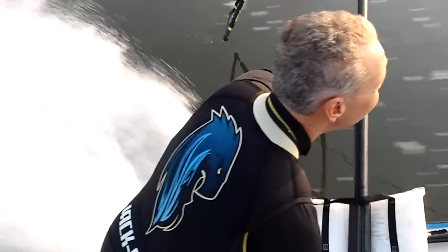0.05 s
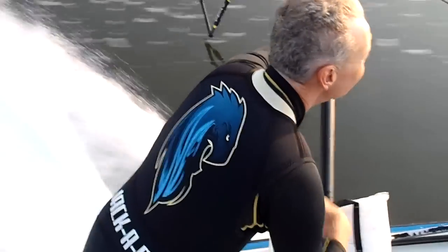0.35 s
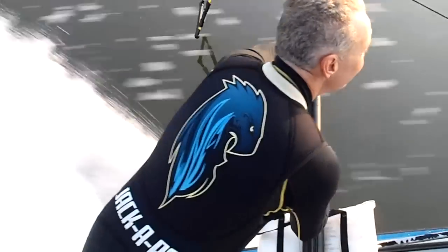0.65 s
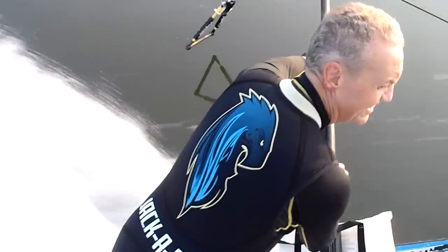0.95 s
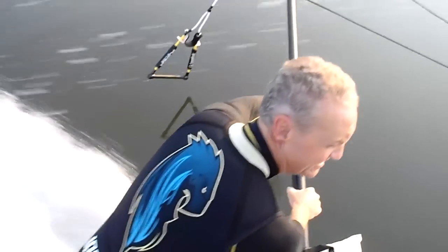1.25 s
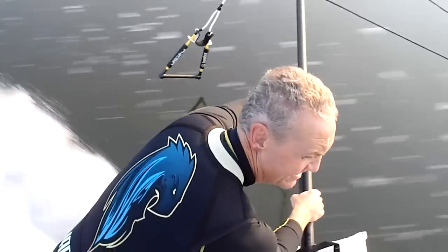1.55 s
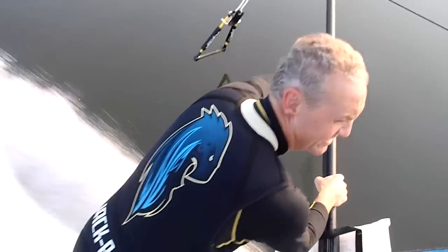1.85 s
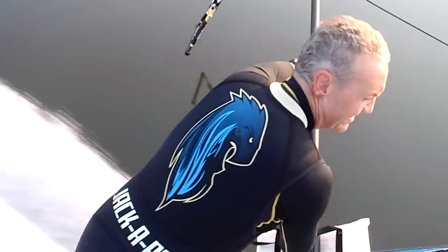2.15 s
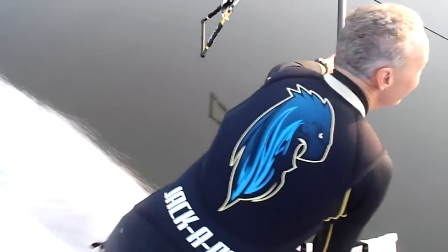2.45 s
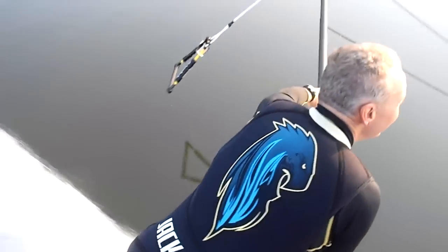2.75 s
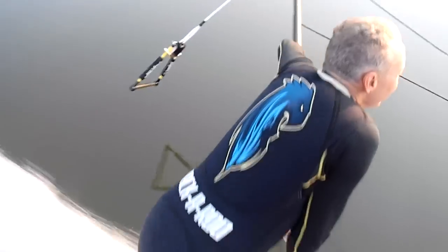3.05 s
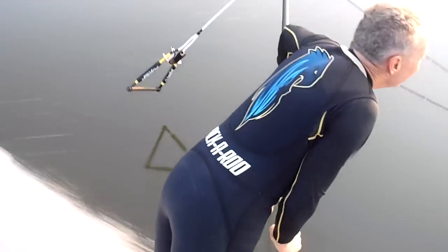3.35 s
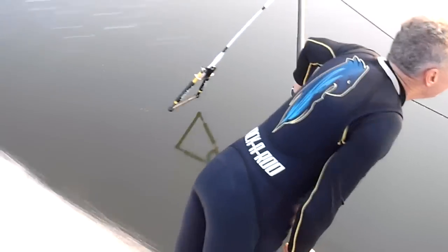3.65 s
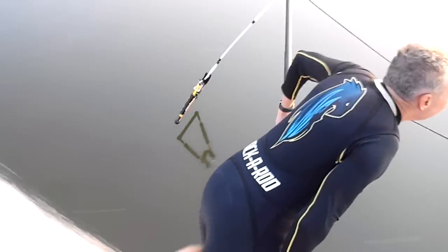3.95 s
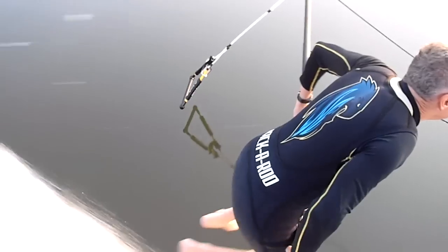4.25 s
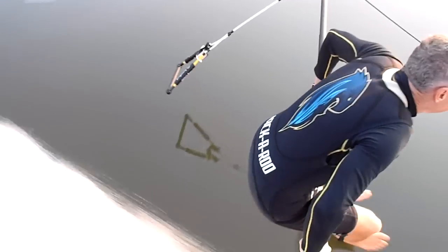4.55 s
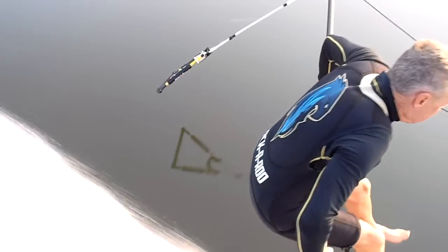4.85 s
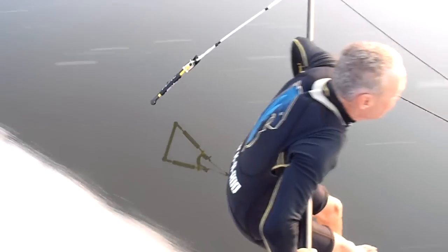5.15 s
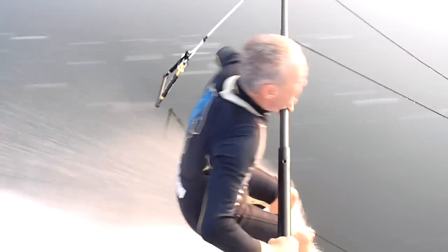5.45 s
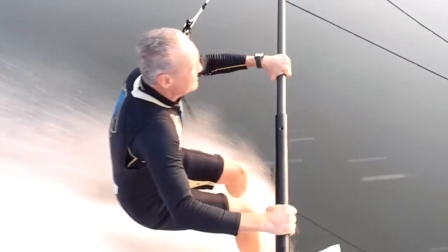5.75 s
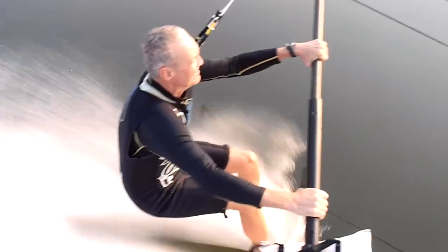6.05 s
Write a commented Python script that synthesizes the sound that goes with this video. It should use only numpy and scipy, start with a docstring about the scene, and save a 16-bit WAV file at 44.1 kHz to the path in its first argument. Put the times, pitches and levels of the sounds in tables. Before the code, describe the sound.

Wind buffets the microphone on a speeding ski boat, with a roaring wake and hissing spray over a droning engine.

```python
"""Wind and wake roar aboard a ski boat, over the drone of a V8 gaining speed.
Turbulent air and water make broadband noise; periodic firings make the engine's tones.
Spray hisses beside the hull, and a barefoot skier on the boom sets his feet into the water.
Gusts buffet a small, dull microphone, whose diaphragm gives more one way than the other."""
import sys
import numpy as np
from scipy import signal
from scipy.fft import rfft, irfft, next_fast_len
from scipy.io import wavfile
from scipy.ndimage import uniform_filter1d, map_coordinates

SR = 44100
rng = np.random.default_rng(int(sys.argv[2]) if len(sys.argv) > 2 else 0)


def int16_out(signal):
    """Quantize to a 16-bit WAV file."""
    q = np.round(np.clip(np.atleast_2d(signal).T, -1, 1) * 32767)
    wavfile.write(sys.argv[1], SR, q.astype(np.int16))


N = 273861

# brief gusts: centre_s, length_s, rise_db
GUSTS = [(.05, 0.052, 4), (.1, 0.022, 2.5), (.135, .03, 0.5), (.344, .02, 6), (.785, 0.05, 2.5),
         (1.11, 0.043, 3), (1.42, 0.18, 0), (1.716, 0.012, 10.5), (2.02, 0.046, 3), (2.275, 0.041, 5),
         (2.462, 0.032, 4), (2.665, 0.035, 4.5), (2.725, 0.022, 3.5), (2.925, 0.035, 3), (3.08, .04, 3.5),
         (3.157, 0.031, 4.5), (3.468, 0.019, 2), (3.742, 0.023, 7.5), (3.905, 0.026, 3.5), (4.36, 0.025, 3),
         (4.645, 0.047, 5.5), (4.73, 0.037, 3.5), (4.867, 0.031, 3.5), (5.011, 0.027, 4),
         (5.248, 0.043, 2.5), (5.353, 0.019, 3), (5.452, 0.037, 5), (5.715, 0.059, 1.5), (5.906, 0.027, 1)]
# brief lulls in the roar of wind and water: centre_s, length_s, dip_db
LULLS = [(.97, .05, 3), (1.49, .02, 0), (1.578, 0.044, 3.5), (1.687, 0.021, 5), (1.795, 0.021, 1),
         (2.49, 0.025, 2), (2.596, 0.026, 0), (2.836, 0.012, 1), (2.968, 0.019, 5), (3.037, .022, 3),
         (3.121, 0.019, 5.5), (3.352, 0.02, 5), (3.432, 0.02, 6.5), (3.586, 0.021, 5), (3.654, 0.042, 3),
         (3.844, .022, 3), (4.024, 0.042, 4), (4.408, .028, 4), (4.513, 0.015, 4.5), (4.597, 0.02, 5),
         (4.79, 0.027, 1.5), (5.19, 0.017, 4), (5.388, 0.023, 9.5), (5.628, 0.026, 4.5)]


def wind(eddies, buffet_db, roar_db, flutter_db):
    """Turbulent pressure fluctuations make a gusty roar and a low buffeting at the microphone port."""
    # strength of the wind over the boat and of the rumble at the port: time_s, level_db
    wind_levels = [(0, -23), (.1, -28), (.22, -26.5), (.5, -26), (.8, -23), (.98, -28), (1.2, -24),
                   (1.45, -21.5), (1.9, -26), (2.5, -25.5), (2.7, -25), (3.2, -24), (4.3, -24), (4.8, -24),
                   (5.3, -22.5), (5.6, -24), (5.78, -24), (5.98, -21.5), (6.12, -30), (6.21, -23)]
    rumble_levels = [(0, -28.5), (.18, -35.5), (.36, -33.5), (.55, -38), (.85, -40), (1.02, -47.5),
                     (1.4, -48.5), (1.9, -49), (2.6, -44.5), (3.4, -46.5), (3.8, -46.5), (4.3, -50),
                     (5.5, -45), (6.21, -58.5)]
    # eddies that swell the rumble: centre_s, length_s, rise_db
    buffets = [(.275, 0.036, 7.5), (.665, .05, -0.5), (2.65, 0.04, 2), (3.7, 0.12, 3), (4.63, 0.08, 7.5)]
    # spectra of rumble and roar: frequency_hz, density_db
    rumble_spectrum = [(12, -0.5), (25, 4.5), (40, -1), (56, 3.5), (80, 1.5), (110, 4), (200, -19.5),
                       (500, -44.5)]
    roar_spectrum = [(40, -37.5), (90, -13), (125, -6.5), (160, -1.7), (210, 1), (280, 0), (360, -3),
                     (500, -7), (750, -16.5), (1400, -33), (4000, -44)]
    rumble_db = buffet_db + curves(rumble_levels)[0] + swells(buffets)
    rumble = amp(rumble_db) * rush(rumble_spectrum, patchy_db=1.0)
    roar = steadied(rush(roar_spectrum, patchy_db=1.0), span_s=0.05)
    gusting_db = curves(wind_levels)[0] + swells(GUSTS) - swells(LULLS)
    return rumble + amp(gusting_db + roar_db + flutter_db * eddies) * roar


def thumps(gain_db, throb_hz, half_width_s):
    """Transient oscillation: a hard eddy rocks the air in the port for a cycle or two."""
    # hard gusts on the microphone: centre_s, level_db
    hard_gusts = [(0.046, -16), (0.063, -9.5), (0.105, -9.5), (0.135, -11), (0.261, -21)]
    out = np.zeros(N)
    for centre_s, db in hard_gusts:
        t = np.arange(N) / SR - centre_s
        out -= amp(db + gain_db) * np.sin(2 * np.pi * throb_hz * t) * np.exp(-(t / half_width_s) ** 2)
    return out


def water(eddies, wake_gain_db, spray_gain_db, flutter_db, burst_db, gust_share, lull_share):
    """Turbulence churns the wake into a roar; sheets of spray break into a hiss of fine drops."""
    # water thrown by the hull and the feet: time_s, wake_db, spray_db
    water_levels = [(0, -51.5, -41), (.08, -36, -41), (.14, -29.5, -37.5), (.3, -30, -36),
                    (.55, -30.5, -38), (.66, -29, -36), (.78, -25.5, -37), (1.0, -27, -39.5),
                    (1.35, -28.5, -39), (1.55, -25, -39.5), (1.8, -26, -37.5), (2.3, -28, -38.5),
                    (2.65, -29, -37.5), (3.3, -26.5, -37.5), (3.6, -26, -39), (4.3, -26.5, -39),
                    (4.75, -27.5, -37.5), (5.25, -28, -39.5), (5.9, -26.5, -38.5), (6.1, -31.5, -38)]
    # slaps of water and sheets of spray, plus a few very brief flickers in the roar:
    # centre_s, length_s, wake_rise_db, spray_rise_db
    surges = [(0.14, 0.055, 1.5, 2.5), (0.255, 0.034, 2.5, 0.5), (0.65, 0.028, 2.5, 1.5),
              (1.065, .022, 6.5, 4), (1.455, .025, 0.5, 2.5), (1.718, 0.033, 2.5, 1), (2.537, .025, 2.5, 3),
              (2.71, 0.027, 3.5, 5), (3.057, .005, 1.5, -4), (3.725, 0.036, 1, 1.5),
              (3.898, 0.019, -2, 4.5), (3.985, 0.0043, 6.5, 2), (4.386, 0.0035, 8, -3),
              (4.445, 0.027, 1.5, 2.5), (4.482, 0.012, 5, 1), (4.631, 0.035, -0.5, 3.5),
              (5.326, 0.0044, 6, 6), (5.445, 0.06, -3.5, 2.2), (5.517, 0.023, 5, 5),
              (5.756, 0.021, -0.5, 2), (6.2, 0.041, 2.5, 4)]
    # spectra of wake and spray: frequency_hz, density_db
    wake_spectrum = [(150, -23.5), (350, -3.5), (520, 1), (750, 0.7), (1000, -4), (1400, -12), (2000, -20),
                     (4000, -31.5)]
    spray_spectrum = [(400, -18.5), (1000, 1.5), (1700, 0.5), (2500, -0.5), (4000, -6.5), (7000, -8.5),
                      (13000, -21.5)]
    # the wake's upper band: frequency_hz, gain_db
    upper_band = [(620, -32), (800, 0), (1400, -1.5), (2000, -27)]
    # how that band swells and sinks: time_s, gain_db
    upper_swell = [(0, -1), (.6, 3), (.82, 1), (1.05, 0), (1.35, -3), (1.8, 1), (2.4, 1.5), (3.3, 0.5),
                   (3.8, -4), (4.35, -2), (4.7, -0.5), (5.4, -2.5), (5.9, -2.5), (6.2, 7)]
    wake_db, spray_db = curves(water_levels)
    wake_rise_db = swells([(s, length, db) for s, length, db, _ in surges])
    spray_rise_db = swells([(s, length, db) for s, length, _, db in surges])
    flicker_db = flutter_db * eddies + burst_db * wobble(170)
    lull_db = swells(LULLS)
    wake_db += wake_gain_db + flicker_db + wake_rise_db + gust_share * swells(GUSTS) - lull_db
    spray_db += spray_gain_db + flicker_db + spray_rise_db - lull_share * lull_db
    churn = steadied(rush(wake_spectrum, patchy_db=0.0), span_s=0.06)
    churn += (amp(curves(upper_swell)[0]) - 1) * coloured(churn, upper_band)
    grain_db = 2.0 * wobble(900)
    hiss = unit(amp(grain_db) * rush(spray_spectrum, patchy_db=0.3))
    patter = hiss + amp(-3.5) * smacks(per_s=180, spread_db=3.5)
    return amp(wake_db) * churn + amp(spray_db) * patter


def smacks(per_s, spread_db):
    """Shot noise at rms 1: lumps of water of unequal size hit the hull at random moments."""
    # spectrum of one impact: frequency_hz, gain_db
    smack_spectrum = [(150, -13.5), (400, -2.5), (900, 2), (1500, -2), (3000, -9), (5000, -17),
                      (12000, -27.5)]
    hits = rng.random(N) < per_s / SR
    sizes = amp(spread_db * rng.uniform(-1.1, 1, N)) * np.sign(rng.standard_normal(N))
    return unit(coloured(hits * sizes, smack_spectrum))


def engine(exhaust_db, drone_db, uneven_db, rough_db, waver_db):
    """Forced vibration: the hull hums at multiples of the crank speed; the exhaust filters firings."""
    # crankshaft speed: time_s, turns_per_s
    crank = [(0, 66.3), (.3, 67.3), (0.6, 68.4), (1.2, 69.5), (1.8, 70.85), (2.1, 71.75), (2.7, 73.15),
             (3.15, 73.8), (3.95, 74.25), (4.75, 73.65), (5.4, 74.2), (6.21, 73.7)]
    # strong multiples of that speed (4 is the firing rate, half orders come from uneven banks): order
    orders = [1, 2, 2.5, 3, 4, 5.5]
    # crank speed pulling away, climbing and cruising: turns_per_s
    stages = [66.5, 70.5, 74]
    # each order's level at those speeds: pulling_db, climbing_db, cruising_db
    order_levels = [(-43.5, -38.5, -37.5), (-27.5, -43, -41), (-30, -46.5, -50.5), (-39, -42.5, -33.5),
                    (-30.5, -41.5, -49), (-60, -39, -41.5)]
    # strength of the hull's hum, easing once the skier's feet drag: time_s, gain_db
    hum = [(0, 2), (.5, -2.5), (1, -0.5), (1.4, 3), (2.2, 0.5), (3.3, 0.5), (3.9, 0.6), (4.7, -1),
           (5.2, -3.5), (6.21, -2)]
    # response of exhaust and hull to a firing: frequency_hz, gain_db
    exhaust_response = [(30, -40.5), (85, -23), (120, -4), (200, -7.5), (400, -5.5), (800, -8.5),
                        (1600, -20), (4000, -41)]
    speed, = curves(crank)
    turns = np.cumsum(speed) / SR
    drone = np.zeros(N)
    for order, levels in zip(orders, order_levels):
        level_db = np.interp(speed, stages, levels) + waver_db * wobble(13)
        drone += amp(level_db) * np.sqrt(2) * np.sin(2 * np.pi * (order * turns + rng.random()))
    fired = np.flatnonzero(np.diff(np.floor(4 * turns)))  # eight firings in two turns
    # each cylinder has its own strength, and no two firings are alike
    cylinders = np.resize(unit(rng.standard_normal(size=8)), len(fired))
    pulses = np.zeros(N)
    pulses[fired] = amp(uneven_db * cylinders + rough_db * rng.standard_normal(len(fired)))
    exhaust = unit(coloured(pulses, exhaust_response))
    return amp(drone_db + curves(hum)[0]) * drone + amp(exhaust_db) * exhaust


def drops(gain_db):
    """Many fine drops add incoherently: each spit is a cloud of noise that thickens and thins away."""
    # spits close to the microphone: centre_s, length_s, level_db
    spits = [(0.136, .025, -25.5), (0.396, 0.052, -31), (1.75, .03, -28), (1.853, 0.073, -30),
             (2.156, 0.0018, -23), (2.912, 0.0036, -22.5), (2.934, 0.013, -28), (3.088, 0.034, -26),
             (3.414, 0.0022, -16.5), (3.552, 0.0033, -20.5), (4.497, .015, -30), (4.634, .025, -28.5),
             (4.651, 0.0027, -21), (4.735, 0.018, -29), (5.436, .012, -28.5), (5.463, .002, -21),
             (5.516, .04, -27), (5.6, .025, -30.5), (5.745, .05, -29.5), (6.184, 0.061, -27)]
    # spectrum of the drops: frequency_hz, gain_db
    drop_spectrum = [(1500, -21.5), (5000, -7.5), (9000, -6.5), (13000, -1.5)]
    t = np.arange(N) / SR
    cloud = sum(amp(db) * bell(t - s, length) for s, length, db in spits)
    return amp(gain_db) * coloured(cloud * rng.standard_normal(N), drop_spectrum)


def rush(spectrum, patchy_db):
    """Turbulent noise at rms 1, with patches of random gain in time and frequency."""
    spectrogram = signal.stft(rng.standard_normal(N), nperseg=512)[2]
    patches = uniform_filter1d(rng.standard_normal(spectrogram.shape), size=7, axis=0)
    patches = unit(uniform_filter1d(patches, size=7, axis=1))
    noise = signal.istft(spectrogram * amp(patchy_db * patches), nperseg=512)[1][:N]
    return unit(coloured(noise, spectrum))


def steadied(x, span_s):
    """x with its swells slower than span_s evened out, at rms 1."""
    power = uniform_filter1d(x ** 2, size=max(int(span_s * SR), 1))
    return unit(x / np.sqrt(np.abs(power) + 1e-9))


def bell(t, length_s):
    """A Gaussian pulse, length_s wide at half height."""
    return np.exp(-np.log(2) * (2 * t / length_s) ** 2)


def swells(rows):
    """Bell-shaped rises in dB from rows of centre_s, length_s, rise_db."""
    t = np.arange(0, N, 32) / SR
    rise_db = sum(db * bell(t - s, length) for s, length, db in rows)
    return np.interp(np.arange(N) / SR, t, rise_db)


def curves(rows):
    """Linear interpolation: one value per sample for each column after the time."""
    times, *columns = np.transpose(rows)
    return [np.interp(np.arange(N) / SR, times, column) for column in columns]


def wobble(knots_per_s):
    """A smooth random curve at rms 1."""
    knots = rng.standard_normal(int(N * knots_per_s / SR) + 4)
    return unit(map_coordinates(knots, [np.arange(N) * knots_per_s / SR]))


def filtered(x, response):
    """Linear filtering: the spectrum of x times a frequency response."""
    size = next_fast_len(N + 8192)
    return irfft(rfft(x, size) * response(np.fft.rfftfreq(size, 1 / SR)), size)[:N]


def coloured(x, points):
    """x filtered by points of frequency_hz, gain_db joined on a log axis."""
    points_hz, db = np.transpose(points)
    return filtered(x, lambda hz: amp(np.interp(np.log(hz + 1), np.log(points_hz), db)))


def amp(db):
    """Decibels to amplitude gain."""
    return 10 ** (np.asarray(db) / 20)


def unit(x):
    """Scale to rms 1."""
    return x / np.sqrt(np.mean(x ** 2) + 1e-20)


def scene():
    """Superposition of wind, water and engine; the same quick eddies modulate air and water."""
    eddies = unit(0.77 * wobble(34) + wobble(110))
    boat = engine(exhaust_db=-38.5, drone_db=-0.5, uneven_db=16.5, rough_db=4.0, waver_db=-0.24)
    air = wind(eddies, buffet_db=3.0, roar_db=-0.5, flutter_db=0.4)
    air += thumps(gain_db=-0.5, throb_hz=167.0, half_width_s=0.0045)
    lake = water(eddies, wake_gain_db=0.68, spray_gain_db=1.27, flutter_db=1.05, burst_db=0.42,
                 gust_share=0.37, lull_share=0.35)
    return (air + lake + boat + drops(gain_db=-3.0))[None]


def record(dry, saturation=0.95, bias=0.6, cutoff_hz=13200):
    """Asymmetric saturation: the diaphragm limits pushes sooner than pulls; its port dulls the treble."""
    # microphone response, with a port resonance near 3 kHz: frequency_hz, gain_db
    mic_response = [(2600, 0), (3150, 3.5), (3500, 0), (4200, -8.5), (5000, -14.5), (6000, -17),
                    (7000, -21), (8200, -29), (9500, -39.5), (13000, -44)]
    fade_in = np.minimum(np.arange(N) / (0.004 * SR), 1)
    drive = fade_in * dry[0] / saturation
    # cosh squared keeps quiet sounds at unit gain
    bent = saturation * (np.tanh(drive + bias) - np.tanh(bias)) * np.cosh(bias) ** 2
    bass_rolloff = [(8, -29.0), (40, 1.5)]  # frequency_hz, gain_db
    heard = coloured(bent, bass_rolloff + list(mic_response))
    return filtered(heard, lambda hz: hz < cutoff_hz)[None]


dry = scene()
out = record(dry)
int16_out(out)
```